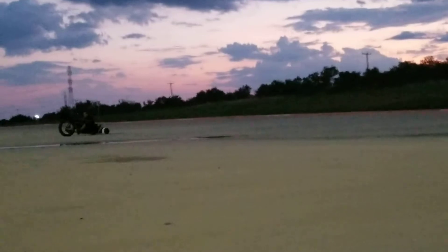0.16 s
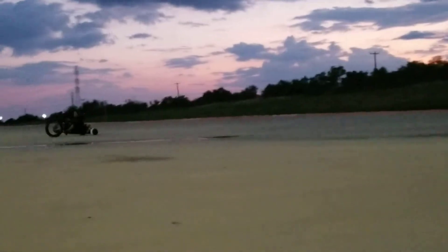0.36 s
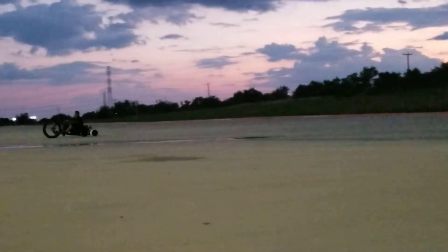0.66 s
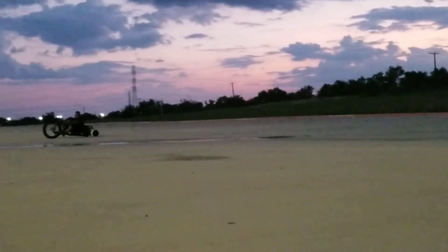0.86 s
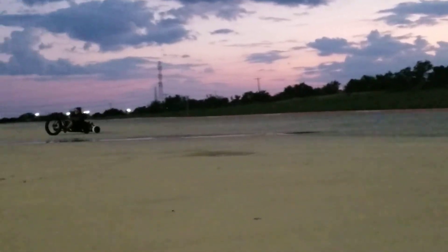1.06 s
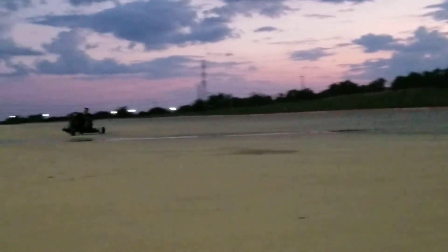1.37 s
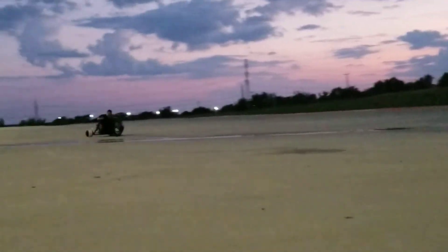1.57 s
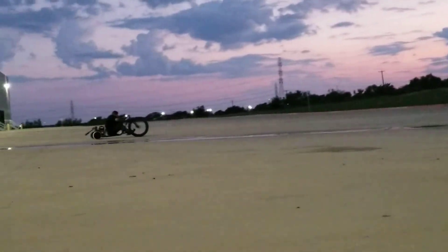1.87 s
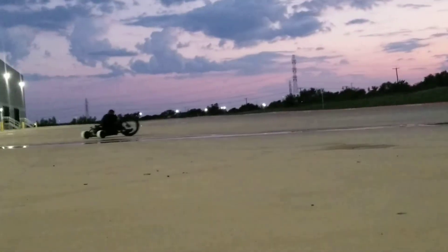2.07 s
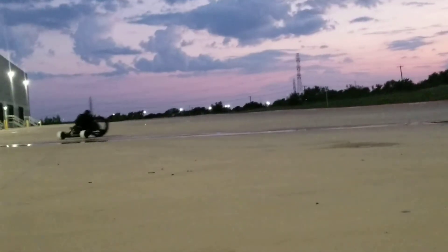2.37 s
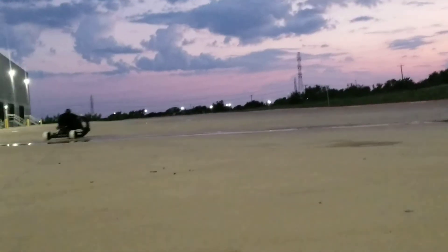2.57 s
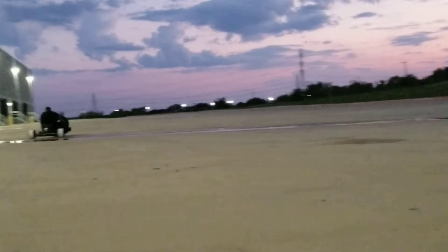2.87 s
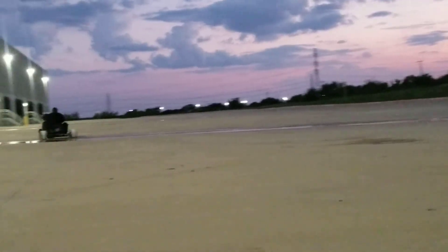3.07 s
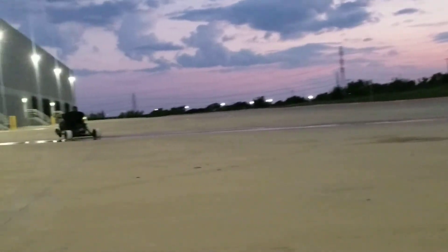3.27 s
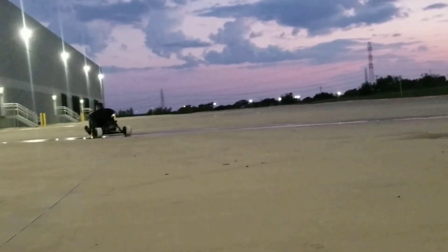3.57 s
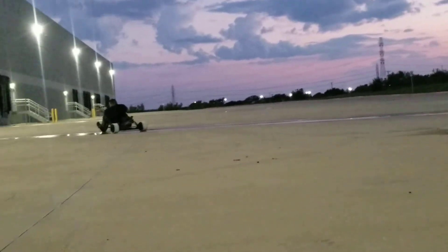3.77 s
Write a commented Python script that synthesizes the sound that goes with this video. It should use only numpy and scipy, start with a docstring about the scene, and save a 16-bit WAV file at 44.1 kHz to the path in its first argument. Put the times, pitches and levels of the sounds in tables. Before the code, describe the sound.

A small single-cylinder engine pulses loudly with a raspy bark as wheels hiss over concrete; it surges, cracks sharply, then falls to a slow, muffled chug with faint ticks, outdoors at a distance.

```python
"""A motor trike drifts on a concrete lot. Its single-cylinder four-stroke first barks under throttle: each firing
sends one surge through the silencer, whose ring rises in pitch as the exhaust valve closes, with noise bursts on top.
The air box hums on between firings. The wheels hiss as filtered noise, loudest as the trike swings round,
where the tyres scrub and one chirps. Then the throttle shuts with hard misfire cracks, the bark fades and the engine
chugs on slower with valve ticks; a wheel knocks over a joint. Low frame rumble and a faint answer from the lot lie below."""
import sys
import numpy as np
from scipy import signal
from scipy.fft import rfft, irfft, next_fast_len
from scipy.io import wavfile
from scipy.ndimage import uniform_filter1d, map_coordinates

SR = 44100
rng = np.random.default_rng(int(sys.argv[2]) if len(sys.argv) > 2 else 0)


def generate_wav(signal):
    """Clip the signal to [-1, 1] and save it as 16-bit WAV at the path in sys.argv[1]."""
    frames = np.transpose(np.atleast_2d(signal))
    scaled = np.clip(frames, -1, 1) * 32767
    pcm = np.round(scaled).astype(np.int16)
    wavfile.write(sys.argv[1], SR, pcm)


N = 172431


def amp(db):
    """Level in decibels to amplitude ratio: 20 dB is a factor of ten."""
    return 10 ** (np.asarray(db) / 20)


def unit(x):
    """Scale to an rms of 1, so that a later gain sets the effective level."""
    return x / np.sqrt(np.mean(x ** 2) + 1e-20)


def along(points, hz):
    """Spectrum read between (frequency, value) points on a logarithmic axis, as pitch is heard."""
    f, v = np.transpose(points)
    return np.interp(np.log(hz + 1), np.log(f + 1), v)


def at(rows, s):
    """Slowly varying parameters: each column interpolated linearly at the times s."""
    knots, *cols = np.transpose(rows)
    return [np.interp(s, knots, c) for c in cols]


def clock():
    """Time axis of the whole scene in seconds."""
    return np.arange(N) / SR


def around():
    """Time axis of one event, 0.1 s either side of it."""
    return np.arange(-SR // 10, SR // 10) / SR


def wobble(rate):
    """Band-limited random modulation: a smooth curve through random knots, rate of them a second."""
    knots = rng.standard_normal(int(N * rate / SR) + 4)
    return map_coordinates(knots, [clock() * rate])


def filtered(x, response):
    """Linear filtering: the spectrum of x times a function of frequency."""
    m = next_fast_len(N + SR // 2)
    hz = np.fft.rfftfreq(m, 1 / SR)
    return irfft(rfft(x, m) * response(hz), m)[..., :N]


def noise(spectrum, patchy_db):
    """Partly coherent stereo noise of rms 1; smoothed random gains make it patchy in time and frequency."""
    # left-right likeness: (frequency [Hz], correlation [0 to 1])
    alike = [(30, 0.51), (100, 1), (300, 1), (700, 0.44), (1500, 0.47), (5000, 0.39), (15000, 0.069)]
    z = signal.stft(rng.standard_normal((2, N)), nperseg=512)[2]
    field = rng.standard_normal(z.shape[1:])
    field = uniform_filter1d(field, size=4, axis=0)
    field = uniform_filter1d(field, size=8, axis=1)
    pair = signal.istft(z * amp(patchy_db * unit(field)), nperseg=512)[1][:, :N]

    def mid_side(hz):
        # cos^2 - sin^2 of this angle is the wanted correlation
        angle = np.arccos(np.clip(along(alike, hz), -1, 1)) / 2
        return amp(along(spectrum, hz)) * [np.cos(angle), np.sin(angle)]

    mid, side = filtered(pair, mid_side)
    return unit(np.array([mid + side, mid - side]))


def lay(times, waves):
    """Superposition: the sum of the waves, each centred on its time."""
    starts = np.round(np.asarray(times)[:, None] * SR).astype(int) - waves.shape[1] // 2
    index = starts + np.arange(waves.shape[1])
    inside = (index >= 0) & (index < N)
    return np.bincount(index[inside], waves[inside], N)


def bursts(times, db, attack_s, decay_s):
    """Impulsive excitation: envelopes with a fast rise and exponential decay, each peaking at its db."""
    t = np.maximum(around(), 0)
    shape = (1 - np.exp(-(t / attack_s) ** 2)) * np.exp(-t / decay_s)
    return lay(times, amp(db)[:, None] * shape / shape.max())


def firings():
    """Phase accumulation: a firing falls wherever the integral of the rate passes a whole number."""
    # engine speed: (time [s], rate [firings/s])
    engine_speed = [(0.0, 21.33), (0.65, 21.58), (0.95, 20.78), (1.24, 18.22), (1.42, 20.48), (1.6, 20.57),
                    (1.73, 23.36), (1.86, 20.25), (1.92, 14.0), (2.05, 12.19), (2.35, 8.76), (2.55, 10.66),
                    (2.8, 13.15), (3.05, 13.11), (3.18, 11.71), (3.42, 13.98), (3.6, 13.87), (3.9, 14.81)]
    first_firing_s = .0157
    rate, = at(engine_speed, clock())
    turns = np.cumsum(rate) / SR
    turns = turns - np.interp(first_firing_s, clock(), turns)
    times = np.interp(np.arange(int(turns[-1]) + 1), turns, clock())
    cycle = 1 / at(engine_speed, times)[0]
    return times, cycle


def silencer(times):
    """Resonator with a moving end condition: each surge swells, glides up as the valve shuts and rings out."""
    # exhaust surge: (time [s], level [dB], pitch with valve open [Hz], pitch with valve shut [Hz]), before scatter
    surge_curve = [(0, -12, 157, 166), (.3, -13.5, 147.4, 172), (.65, -16, 139, 174), (.9, -15.5, 135, 247),
                   (1.15, -16, 130, 242), (1.3, -18, 133, 240), (1.38, -23, 127, 243),
                   (1.46, -15, 143, 258), (1.6, -15.5, 154, 263), (1.72, -21.5, 150, 246),
                   (1.83, -10, 166, 277), (1.9, -19.5, 136, 255), (1.96, -23, 119, 260),
                   (2.12, -19, 112, 228), (2.22, -26, 119, 208), (2.85, -20, 126, 221),
                   (2.95, -15.5, 149, 228), (3.22, -19, 142, 213), (3.48, -13.5, 153, 229),
                   (3.9, -16.5, 135, 243)]
    # shape of the surge: (time [s], swell [s], ring [s], valve shutting after the crest [s])
    surge_shape = [(.5, .009, .014, .01), (1.1, .0055, .018, .01), (1.35, .005, .018, .01),
                   (1.8, .006, .014, .0105), (2.05, .012, .010, 0), (3.9, .010, .011, -.004)]
    # hollow notes of the silencer: (frequency [Hz], relative level [dB])
    hollow = [(495, 0), (645, 0.5)]
    shut_s, third_db = 0.0034, -19  # time scale of the valve shutting; third harmonic
    puff_db, puff_s, puff_scatter_db = -18.5, 0.0068, 1.5
    t = around()
    db, open_hz, shut_hz = at(surge_curve, times[:, None])
    swell, ring, shut_at = at(surge_shape, times[:, None])
    chance = rng.standard_normal((len(times), 2 + len(hollow)))
    closure = (1 + np.tanh((t - shut_at) / shut_s)) / 2
    hz = (open_hz + (shut_hz - open_hz) * closure) * (1 + 0.0089 * chance[:, :1])
    phase = 2 * np.pi * np.cumsum(hz, axis=1) / SR
    phase = phase - phase[:, [len(t) // 2]]  # zero at the crest
    env = np.exp(np.where(t < 0, -(t / swell) ** 2 / 2, -t / ring))
    surge = -env * np.cos(phase) + amp(third_db) * env ** 2 * np.cos(3 * phase)
    notes = 0
    for k, (note_hz, level) in enumerate(hollow, 2):
        notes = notes + amp(level + puff_scatter_db * chance[:, [k]]) * np.cos(2 * np.pi * note_hz * t)
    puff = -amp(puff_db) * np.exp(-((t - .003) / puff_s) ** 2 / 2) * notes
    return lay(times, amp(db + 0.35 * chance[:, 1:2]) * (surge + puff))


def air_box(times, cycle):
    """Forced resonance: the engine harmonic nearest the box's resonance swells on every intake stroke."""
    # ring of the air box: (time [s], level before flutter [dB], resonance [Hz])
    box_curve = [(0, -34, 244), (.22, -20.5, 236), (.6, -28, 236), (.78, -21, 240), (1.28, -17, 242),
                 (1.385, -19.5, 243), (1.45, -19, 243), (1.7, -14.5, 243), (1.82, -17.5, 264),
                 (1.92, -22.5, 255), (2.06, -50, 238), (2.18, -25.5, 236), (2.26, -39, 234),
                 (2.6, -25.5, 235), (2.88, -27, 236), (2.97, -19.5, 238), (3.27, -26.5, 234),
                 (3.5, -19.5, 238), (3.75, -27, 237), (3.9, -18.5, 239)]
    intake_turn, intake_width = 0.62, .12  # place and spread of the intake stroke [cycles]
    ring_share = 0.16  # part of the ring that stays between strokes
    edges = np.r_[times[0] - cycle[0], times, times[-1] + cycle[-1]]
    position = np.interp(clock(), edges, np.arange(len(edges)))
    number, turn = np.divmod(position, 1)
    harmonic = np.round(at(box_curve, edges[:-1])[1] * np.diff(edges))
    order = harmonic.take(number.astype(int), mode="clip")
    stroke = np.exp(-((turn - intake_turn) / intake_width) ** 2 / 2)
    swelling = ring_share + (1 - ring_share) * stroke
    size = amp(at(box_curve, clock())[0]) * swelling * amp(2.3 * wobble(25.11))
    return -size * np.cos(2 * np.pi * order * turn)


def gas_kick(times, cycle, db):
    """Blowdown pulse: a brief pressure wave as the exhaust valve opens, and its weaker rebound."""
    kick_db, kick_s = -0.5, 0.00093
    rebound_db, rebound_turn = -15.5, 0.249  # delay in cycles
    u = around() / kick_s
    kicks = amp(db + kick_db)[:, None] * (u ** 2 - 1) * np.exp(-u ** 2 / 2)
    return lay(times, kicks) + amp(rebound_db) * lay(times + rebound_turn * cycle, kicks)


def pipe_ring(times, db):
    """Modal synthesis: each firing excites the decaying modes of silencer shell and pipe."""
    # modes: (frequency [Hz], relative level [dB], 60 dB decay time [s])
    shell_modes = [(205, -16.5, 0.11), (318.7, -1, 0.11), (443.5, -5, 0.098), (516.4, 2, 0.043),
                   (589, -3.5, 0.061), (690.3, -3.5, 0.048), (694, -12, 0.038), (1044, -7.5, 0.026),
                   (1160, -34, 0.019), (1410, -14.5, 0.069)]
    t = np.maximum(around(), 0)
    modes = np.array([amp(level - 60 * t / t60) * np.sin(2 * np.pi * hz * t) for hz, level, t60 in shell_modes])
    modes = modes * (1 - np.exp(-t / 0.0024))  # soft onset
    scattered_db = db[:, None] + rng.standard_normal((len(times), len(shell_modes)))
    return amp(-4) * lay(times, -amp(scattered_db) @ modes)


def bark(times, cycle):
    """Jet noise and pulse: the gas kicks, cracks and rings the pipe; a second burst follows as the valve seats."""
    # sharpness of the exhaust under throttle: (time [s], level before each part's offset and scatter [dB])
    bark_level = [(0, -13.5), (.25, -12.5), (.7, -13), (.9, -12.5), (1.05, -12.5), (1.1, -15),
                  (1.21, -15.5), (1.3, -11.5), (1.365, -14), (1.415, -14.5), (1.47, -17), (1.6, -17),
                  (1.72, -16), (1.83, -14.5), (1.9, -21.5), (1.98, -61), (3.9, -87)]
    # spectra of the rasp and of the valve seating: (frequency [Hz], relative level [dB])
    rasp_spectrum = [(350, -1), (550, 9), (800, 4), (1100, 8), (1270, -3), (2200, 1.5), (2750, 2.5),
                     (3300, 1), (4200, 6.5), (5300, 0.5), (7200, -1), (8600, -13), (15500, -11)]
    clatter_spectrum = [(300, -31), (600, -3), (1300, -11.5), (2400, 4.5), (3300, -1), (4200, -3),
                        (5500, 2.5), (7000, -3.5), (8500, -15), (15500, -22)]
    rasp_db, rasp_lead_s, rasp_attack_s, rasp_decay_s = -5, 0.0025, 0.0025, 0.0043
    clatter_db, clatter_turn, clatter_decay_s = -5, 0.189, 0.003  # turn: delay in cycles
    burst_scatter_db = 1.93
    db, = at(bark_level, times)
    first, second = db + burst_scatter_db * rng.standard_normal((len(times), 2)).T
    kick = gas_kick(times, cycle, db)
    pipe = pipe_ring(times, db)
    rasp_env = bursts(times - rasp_lead_s, first + rasp_db, rasp_attack_s, rasp_decay_s)
    rasp = rasp_env * noise(rasp_spectrum, patchy_db=2)
    clatter_env = bursts(times + clatter_turn * cycle, second + clatter_db, 0.001, clatter_decay_s)
    clatter = clatter_env * noise(clatter_spectrum, patchy_db=4.0)
    return kick + pipe + rasp + clatter


def cracks_and_ticks():
    """Impulsive noise: hard misfire cracks as the throttle shuts, then valve ticks at idle, in short bright bursts."""
    # cracks and valve ticks: (time [s], envelope peak [dB])
    crack_times = [(1.649, -22), (1.694, -23), (1.734, -16.5), (1.78, -16.5), (1.797, -32), (1.826, -13.5),
                   (1.837, -38), (1.841, -19.5), (1.875, -16.5), (2.10, -26), (2.5, -29), (2.914, -29.5),
                   (2.988, -31), (3.067, -25.5), (3.147, -27), (3.308, -28), (3.383, -34), (3.454, -28),
                   (3.599, -32), (3.809, -34.5), (3.876, -34)]
    # spectrum: (frequency [Hz], relative level [dB])
    crack_spectrum = [(500, -4), (1500, -2), (3000, -4), (4500, 7), (5700, 4.5), (7000, 7.5), (8500, -7.5),
                      (12000, -7), (15500, -16)]
    s, db = np.transpose(crack_times)
    return bursts(s, db, 0.00026, decay_s=0.0064) * noise(crack_spectrum, patchy_db=5.0)


def joint_knock():
    """Impulse radiation: a wheel bumps over a joint, a push followed by a longer, shallower pull."""
    knock_s, knock_db, push_s = 2.612, -11.5, .0008
    u = np.maximum(clock() - knock_s, 0) / push_s
    return amp(knock_db) * (u > 0) * (1 - u) * np.exp(-u)


def wheels():
    """Friction noise: dense sliding hiss, rolling noise and a fine fizz, sharing one random grit."""
    # wheels on concrete, before offsets and grit: (time [s], slide level [dB], roll level [dB], fizz level [dB])
    wheel_levels = [(0.0, -37.5, -40, -38), (0.67, -34.5, -37.5, -36.5), (0.88, -33.5, -37, -38.5),
                    (1.28, -33.5, -34.5, -38), (1.41, -32.5, -37.5, -38), (1.5, -28.5, -35, -46),
                    (1.65, -27, -37.5, -47), (1.8, -32, -39, -49), (1.93, -32, -37, -43),
                    (2.13, -39.5, -42, -45.5), (2.5, -41.5, -43, -48.5), (2.87, -44.5, -43.5, -51.5),
                    (3.1, -39.5, -40.5, -44), (3.3, -44, -41, -52.5), (3.45, -43, -39.5, -47.5),
                    (3.64, -46, -40.5, -47), (3.9, -43.5, -39.5, -41)]
    # spectra of slide, roll and fizz: (frequency [Hz], relative level [dB])
    slide_spectrum = [(1500, -29), (2700, 0), (3400, -2.5), (4500, 3.5), (5500, 0), (7000, 0.5),
                      (8300, -15), (11000, -58), (16000, -24)]
    roll_spectrum = [(100, 2), (380, 0.5), (680, 5), (850, -3), (1150, -0.5), (1400, -2.5), (2000, -0.5),
                     (2800, -8.5), (3600, -17.5), (7000, -29.5)]
    fizz_spectrum = [(5000, -8), (8500, -1), (10000, 0.5), (11500, 2.5), (13000, -1), (15500, 1.5)]
    slide_offset_db, roll_offset_db, fizz_offset_db = 1, 2, 1.5
    slide_db, roll_db, fizz_db = at(wheel_levels, clock())
    grit_db = 1.05 * wobble(170)
    slide_gain = amp(slide_db + slide_offset_db + .5 * grit_db + 1.3 * wobble(26.16))
    slide = slide_gain * noise(slide_spectrum, patchy_db=1.5)
    roll = amp(roll_db + roll_offset_db + grit_db) * noise(roll_spectrum, patchy_db=1.0)
    fizz = amp(fizz_db + fizz_offset_db + 0.48 * grit_db) * noise(fizz_spectrum, patchy_db=3.0)
    return slide + roll + fizz


def tyre_chirp():
    """Stick-slip tone: one tyre grabs for a moment, a short sine with a wandering phase."""
    chirp_s, chirp_hz, chirp_db, length_s = 1.70, 674, -23, 0.011
    t = clock() - chirp_s
    env = amp(chirp_db) * np.exp(-(t / length_s) ** 2 / 2)
    return env * np.sin(2 * np.pi * chirp_hz * t + .5 * wobble(60))


def tyre_scrub():
    """Lateral friction: tyres scrub sideways as the trike swings round, noise with a fluttering level."""
    # scrub: (time [s], level before flutter [dB])
    scrub_level = [(1.4, -56), (1.6, -37.5), (1.8, -24.5), (1.87, -28), (2, -54), (2.3, -38), (2.45, -64)]
    # spectrum: (frequency [Hz], relative level [dB])
    scrub_spectrum = [(250, -6.5), (420, 4.5), (560, 3), (690, 5), (780, -7), (900, -7.5), (1200, -6),
                      (1700, -23)]
    return amp(at(scrub_level, clock())[0] + wobble(54)) * noise(scrub_spectrum, patchy_db=1)


def frame_rumble():
    """Structure-borne sound: the frame rumbles as low-frequency noise."""
    # rumble: (time [s], level [dB])
    rumble_level = [(0, -34), (1.4, -36), (1.85, -30), (2.05, -39), (2.8, -41), (3.9, -35)]
    # spectrum: (frequency [Hz], relative level [dB])
    rumble_spectrum = [(25, -24), (50, -7.5), (80, 9.5), (130, 8.5), (250, 7.5), (400, -9.5), (800, -69)]
    return amp(at(rumble_level, clock())[0]) * noise(rumble_spectrum, patchy_db=0.0)


def yard(x):
    """Diffuse reverberation: convolution with exponentially decaying noise, a faint answer from the lot."""
    yard_db, yard_t60 = -10, 0.096  # 60 dB decay time [s]
    t = np.arange(SR // 2) / SR
    tail = rng.standard_normal((2, len(t))) * amp(-60 * t / yard_t60)
    tail = tail / np.linalg.norm(tail[0])
    return amp(yard_db) * signal.fftconvolve(x, tail, axes=1)[:, :N]


def scene():
    """Interaural cues: level and arrival time differ between the channels, the left leading."""
    # balance: (frequency [Hz], left minus right [dB])
    left_right = [(100, 0.5), (2000, 0.7), (5500, -2), (9000, 3.5), (15000, 8.5)]
    low_cut_hz, left_lead_s = 47, .00007  # the exhaust radiates little below the cut
    times, cycle = firings()
    engine = silencer(times) + air_box(times, cycle) + bark(times, cycle)
    engine = filtered(engine, lambda hz: hz ** 4 / (hz ** 4 + low_cut_hz ** 4))
    trike = engine + cracks_and_ticks() + joint_knock() + wheels()
    trike = trike + frame_rumble() + tyre_chirp() + tyre_scrub()
    side = np.array([[1], [-1]]) / 2  # half of each difference to either channel

    def placing(hz):
        return amp(side * along(left_right, hz)) * np.exp(2j * np.pi * hz * side * left_lead_s)

    return filtered(trike + yard(trike), placing)


def record(dry):
    """Band limitation: an ideal low-pass keeps nothing from 15950 Hz up."""
    return filtered(dry, lambda hz: hz < 15950)


dry = scene()
out = record(dry)
generate_wav(out)
```